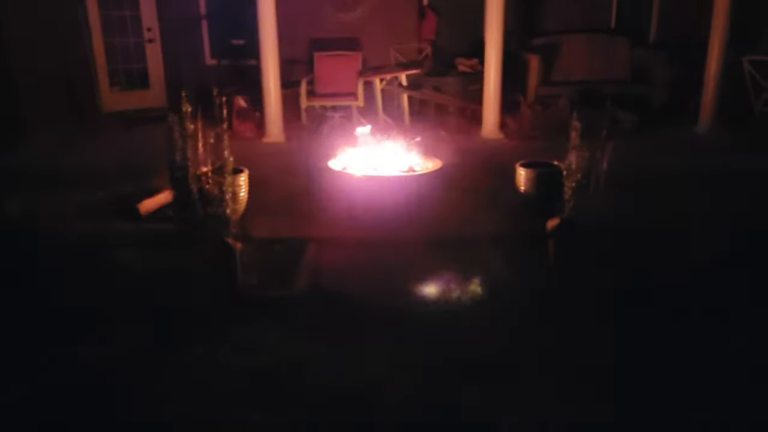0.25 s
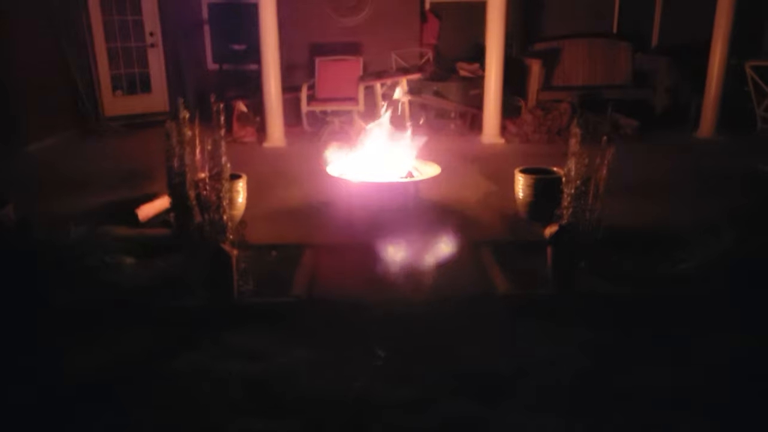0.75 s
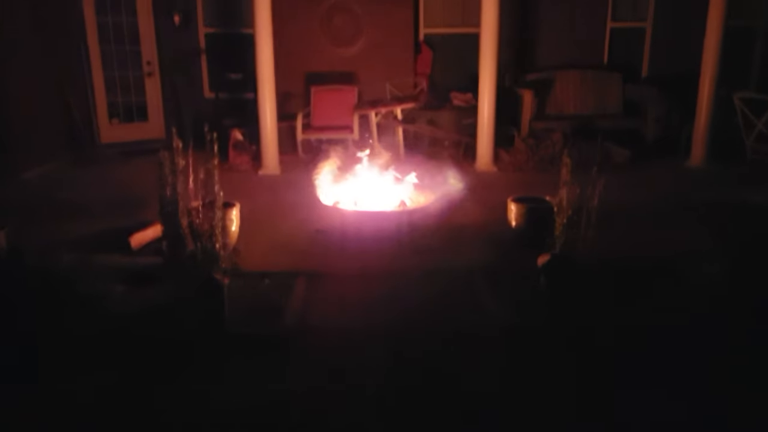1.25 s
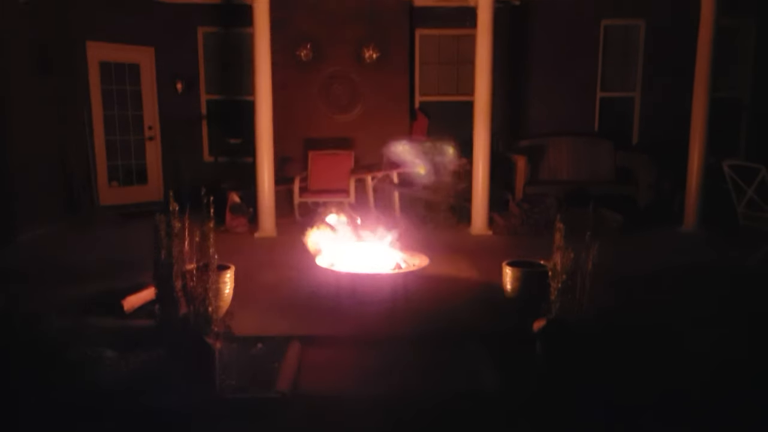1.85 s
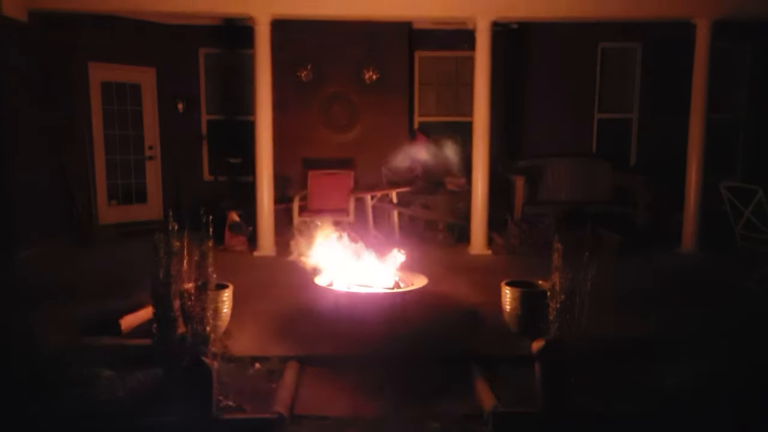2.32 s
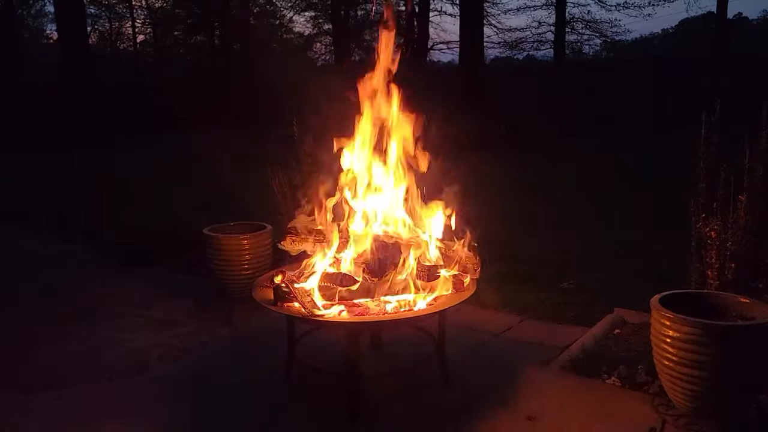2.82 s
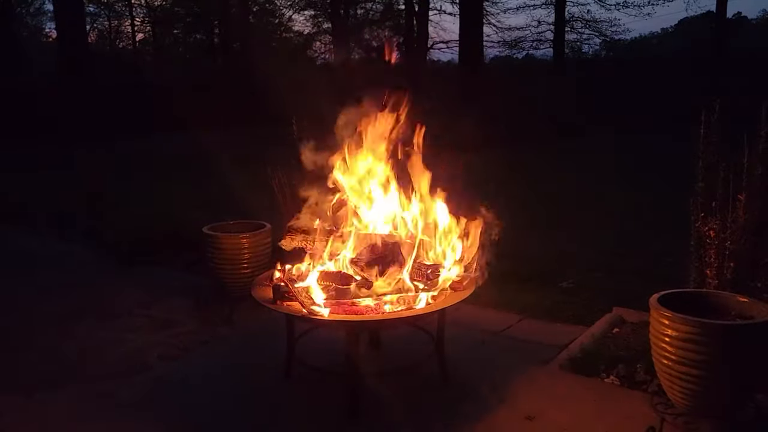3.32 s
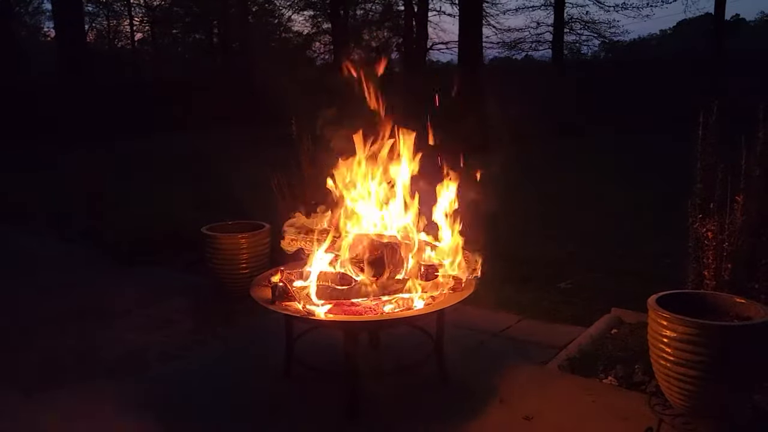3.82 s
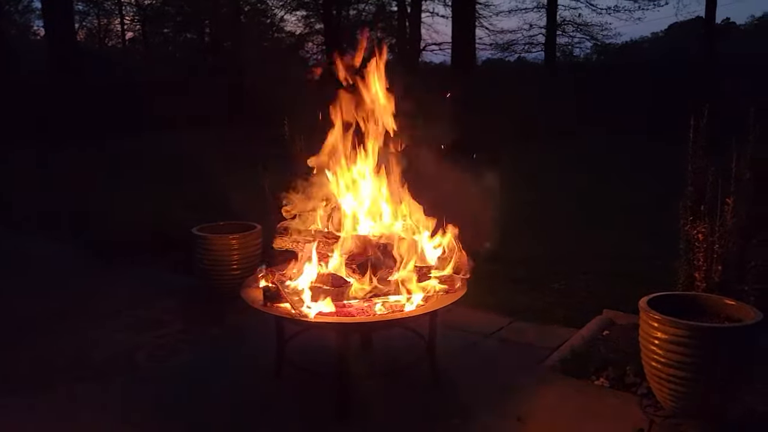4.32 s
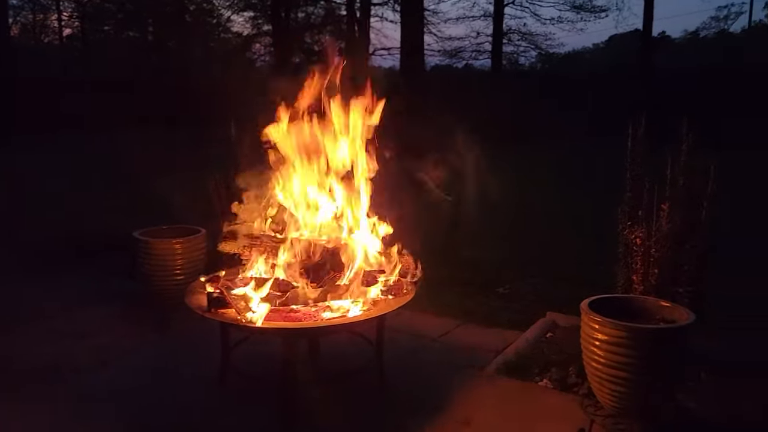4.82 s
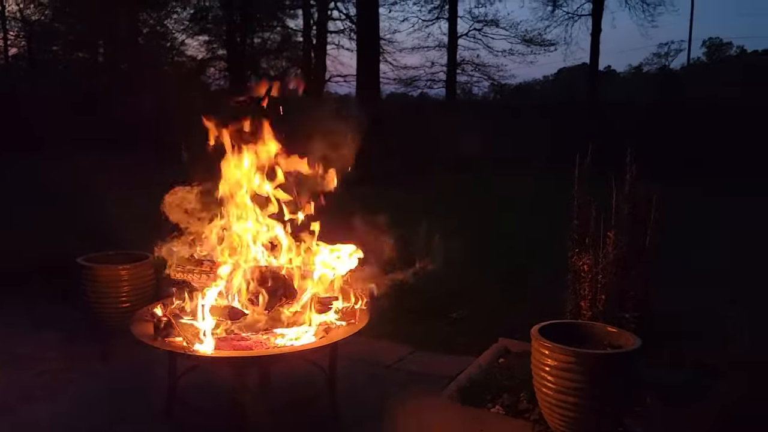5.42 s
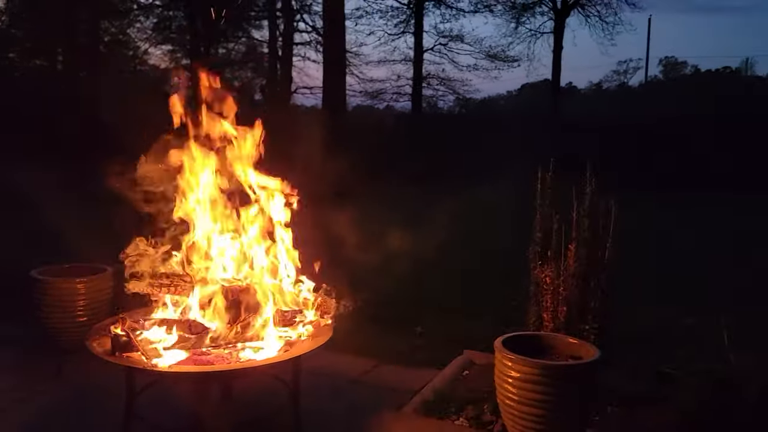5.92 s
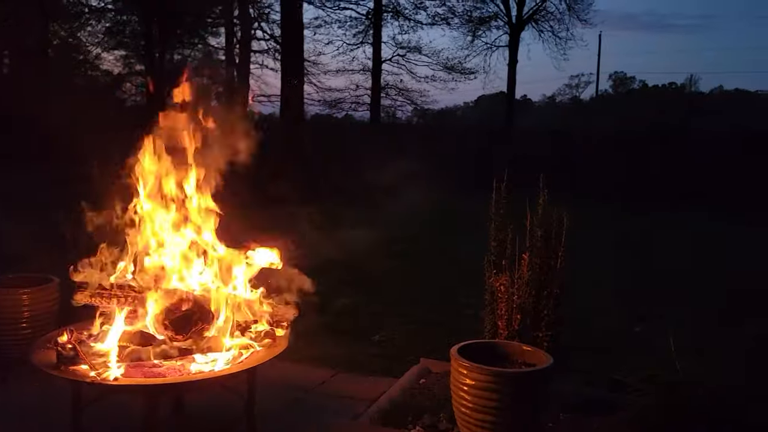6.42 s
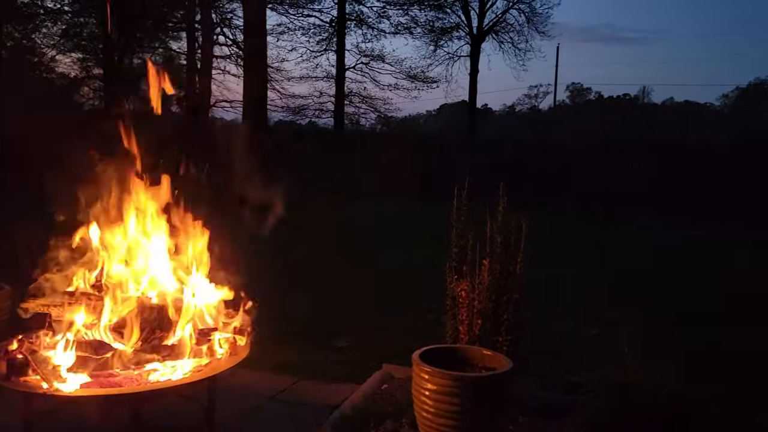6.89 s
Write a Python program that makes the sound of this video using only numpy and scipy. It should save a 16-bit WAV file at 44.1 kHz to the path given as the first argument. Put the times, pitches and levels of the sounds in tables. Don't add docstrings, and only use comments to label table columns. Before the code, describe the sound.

An outdoor fire rumbles in wind while crickets trill, cuts out briefly, then returns calmer and closer, snapping and popping loudly.

```python
import sys
import numpy as np
from scipy import signal
from scipy.fft import rfft, irfft, next_fast_len
from scipy.io import wavfile
from scipy.ndimage import uniform_filter1d

SR = 44100
rng = np.random.default_rng(int(sys.argv[2]) if len(sys.argv) > 2 else 0)


def ratio(d):
    e = np.asarray(d, float) / 20
    return 10 ** e


def dump(signal):
    limited = np.clip(np.atleast_2d(signal).T, -1, 1)
    pcm = np.round(limited * 32767).astype(np.int16)
    wavfile.write(sys.argv[1], SR, pcm)


N = 315315
T = np.arange(N) / SR

FAR_S, NEAR_S = 2.4306, 2.650
# centre_hz, width_hz, level_db
SNAP = [(4700, 1200, 0), (6600, 1200, -10), (9600, 900, -23)]
# centre_hz, width_hz, level_db
TICK = [(9800, 440, -1.5), (12540, 1700, -3.5), (14400, 5300, -2.5)]


def unit(x):
    return x / np.sqrt(np.mean(x ** 2))


def at_hz(table, hz):
    table_hz, value = np.transpose(table)
    return np.interp(np.log(hz), np.log(table_hz), value)


def walk(rate):
    hold = int(SR / rate)
    steps = np.repeat(rng.standard_normal(N // hold + 1), hold)
    return unit(uniform_filter1d(uniform_filter1d(steps, hold), hold)[:N])


def sides(pan_db):
    return ratio(np.array([pan_db / 2, -pan_db / 2])).reshape(2, -1)


def ring(x, modes):
    size = 1024
    hz = np.fft.rfftfreq(size, 1 / SR) + 1
    power = 0
    for mid_hz, width_hz, db in modes:
        power = power + ratio(2 * db) / (1 + ((hz - mid_hz ** 2 / hz) / width_hz) ** 2) ** 2
    cepstrum = irfft(np.log(power + 1e-12) / 2)
    cepstrum[1:size // 2] *= 2
    cepstrum[size // 2 + 1:] = 0
    body = irfft(np.exp(rfft(cepstrum)))[:size // 2]
    return signal.fftconvolve(x, body[None] / np.abs(body).max(), axes=1)[:, :x.shape[1]]


def flames_and_air(heard, colour, alike, lag_s, flames, follow, gust_db, pan_db, flicker_db, roar_flicker_db):
    # pitch_hz, left_minus_right_db
    port_table = [(60, -1), (110, 1.5), (200, -1), (380, 1), (700, 0.5), (1290, -3.5), (2380, 5),
                  (4400, -3.5), (8120, 14.5), (15000, -16.5)]
    # pitch_hz, level_db (per Hz)
    self_noise = [(4880, -55.5), (8300, -25.5), (10400, 1), (11400, -5), (12500, -1.5), (15100, -4.5),
                  (15700, -5.5)]
    roar_shape, hiss_shape, hiss_db, self_db, level_db = colour
    height = np.interp(T, *np.transpose(flames))[heard]
    gust_db, pan_db = gust_db[heard], pan_db[heard]
    roar_db, mid_db, top_db = (share * (height - np.median(height)) for share in follow)
    roar_db = roar_db + gust_db - np.median(gust_db)

    size = next_fast_len(len(pan_db))
    hz = np.fft.rfftfreq(size, 1 / SR) + 1e-3
    common = np.clip(at_hz(alike, hz), 0, .97)
    late = np.exp(-2j * np.pi * hz * lag_s)
    left, other = rfft(rng.standard_normal((2, N))[:, :size])
    right = common * late * left + np.sqrt(1 - common ** 2) * other

    shape = np.hypot(ratio(at_hz(roar_shape, hz)), ratio(at_hz(hiss_shape, hz) + hiss_db))
    shape = np.hypot(shape, ratio(at_hz(self_noise, hz) + self_db))
    shape /= np.sqrt(1 + common * late.real)
    both = np.array([left, right]) * shape * sides(at_hz(port_table, hz))
    both *= ratio(level_db) / np.sqrt(np.mean(irfft((both[0] + both[1]) / 2, size) ** 2))

    out = np.zeros((2, N))
    for centre_hz in 32 * 2. ** np.arange(10):
        octave = np.clip(1 - abs(np.log2(hz / centre_hz)), 0, 1)
        band = irfft(both * octave, size)[:, :len(pan_db)]
        low = np.interp(centre_hz, [150, 500], [1, 0])
        high = np.interp(centre_hz, [3000, 8000], [0, 1])
        db = low * roar_db + high * top_db + (1 - low - high) * mid_db
        db = db + (low * roar_flicker_db + (1 - low) * flicker_db) * walk(9)[heard]
        out[:, heard] += band * ratio(db) * (sides(low * pan_db) if low else 1)
    return out


def cracks(shared=0.41, ragged=0.17, pan_db=2.5, bounce=.7, lumpy_db=2.8, dull_db=-3):
    # start_s, snap_db, knock_above_snap_db, knock_hz, echo_db
    large_pockets = [(0.3614, -64.5, 12, 730, -14), (1.939, -59, -3, 800, -31), (2.336, -58, -10, 680, -37),
                     (3.075, -45.5, 9, 1157, -16), (3.754, -60, 5, 960, -16), (4.083, -55.5, -12, 770, -28),
                     (4.2911, -57, -4, 993, -24), (4.3065, -51.5, 7.5, 2130, -37),
                     (4.4848, -35, 1, 2150, -27.5), (4.5113, -46, -7, 2250, -40),
                     (4.999, -55, 8, 1470, -17), (5.517, -53.5, 3, 1230, -21),
                     (6.3711, -53, 4.5, 2120, -20), (6.7245, -32, 3, 1470, -21.5),
                     (6.7874, -55, 0, 762, -19), (6.9053, -52, 0, 1310, -22)]
    # start_s, snap_db, tick_above_snap_db
    small_pockets = [(1.6394, -67, -9), (2.1136, -64, -19), (3.342, -65, -15), (3.6204, -66, -4),
                     (3.693, -65, -16), (4.126, -66, -6), (4.1784, -61, -3), (4.44, -64, -35),
                     (4.517, -61, -11), (4.5747, -62, -13), (5.048, -59.5, -11), (5.154, -63, -2.5),
                     (5.6706, -55.5, -10), (5.7618, -55, -6), (5.9342, -58, -22), (6.0614, -59, -17),
                     (6.7937, -62, -18), (6.8143, -59, -29), (6.871, -59, -27), (6.9804, -71, -22),
                     (7.099, -63, -19)]
    # centre_hz, width_hz, level_db
    knock_modes = [(450, 450, -5), (900, 800, -3), (2250, 1000, -4), (3200, 1200, -7)]
    large_tick_db = -71.5
    spit_knock_db, spit_knock_hz, spit_echo_db = -7.5, 985, -23
    split_s = .0016
    echo_start_s, echo_end_s, echo_fade_s = 0.0078, 0.039, 0.069

    size = int(.2 * SR)
    lag = np.arange(size) / SR
    tail = np.exp(-np.clip(lag - echo_end_s, 0, 1) / echo_fade_s * 3.4 - lag / 0.081)
    cloud = np.clip(lag / echo_start_s, 0, 1) * tail
    cloud = cloud * ratio(lumpy_db * np.array([walk(270), walk(300)])[:, :size])

    pockets = [(s, db, knock_db, hz, large_tick_db - db, echo_db)
               for s, db, knock_db, hz, echo_db in large_pockets]
    pockets += [(s, db, spit_knock_db, spit_knock_hz, tick_db, spit_echo_db)
                for s, db, tick_db in small_pockets]
    out = np.zeros((2, N + size))
    for s, db, knock_db, knock_hz, tick_db, echo_db in pockets:
        noise = rng.standard_normal((5, size))
        splinters = shared * noise[0] + (1 - shared) * 1.56 * noise[1:3]
        burst = splinters * np.exp(-lag / split_s) * ragged
        burst[[0, 1], [0, 7]] += 1
        late = int(SR / knock_hz)
        burst[[0, 1], [late, late + 6]] += bounce
        burst = burst * sides(pan_db)
        echo = ratio(echo_db - 11) * cloud * noise[3:]
        knock = ring(burst + echo, knock_modes + [(knock_hz, 0.5 * knock_hz, -1.5)])
        bright = burst + ratio(dull_db) * echo
        crack = ratio(knock_db) * knock - ring(bright, SNAP) + ratio(tick_db + 7.0) * ring(bright, TICK)
        i = int((s + .0004) * SR)
        out[:, i:i + size] += ratio(db + 3.5) * crack
    return out[:, :N]


def crackle(per_s=60, spread_db=3.5, level_db=-78):
    clicks = (rng.random(N) < per_s / SR) * ratio(level_db + spread_db * rng.exponential(size=N))
    clicks = clicks * sides(3.0 * rng.standard_normal(N))
    return ring(clicks, SNAP) + ratio(-1.5) * ring(clicks, TICK)


def cricket(trill, wing, stroke=.78, uneven_db=1.7, smear_s=.011):
    bout_edge_s = 0.022
    rate, wing_hz, fall_hz, pan_db, wet_db, swell_db = wing
    cycles = np.cumsum(rate * (1 + .011 * walk(12))) / SR
    part = np.clip(cycles % 1 / stroke, 0, 1)
    size, start, detune = rng.standard_normal((3, N // 500))[:, cycles.astype(int)]
    pitch_hz = wing_hz * (1 + 0.003 * detune) - fall_hz * part ** 2.6
    phase = 2 * np.pi * (np.cumsum(pitch_hz) / SR + start)
    tone = ratio(uneven_db * size) * np.sin(np.pi * part ** 0.85) * np.sin(phase)

    direct = np.array([tone, np.roll(tone, shift=19)])
    lag = np.arange(3000) / SR
    paths = rng.standard_normal((2, len(lag))) * np.exp(-lag / smear_s)
    scatter = signal.fftconvolve(tone[None], paths, axes=1)[:, :N]
    singing = np.zeros(N)
    for on, off, db in trill:
        singing += ratio(db) * np.clip(np.minimum(T - on, off - T) / bout_edge_s + .5, 0, 1)
    song = unit(unit(direct) + ratio(wet_db) * unit(scatter))
    return song * ratio(swell_db * walk(10)) * singing * sides(pan_db)


def gusts():
    # middle_s, half_length_s, above_calm_db, left_minus_right_db
    gust_table = [(0.047, 0.047, 10, -6), (0.215, .05, 9.5, -13.5), (0.525, 0.29, 4, 2),
                  (0.803, 0.17, 6.5, 5), (1.063, 0.031, 2.5, 8), (1.303, 0.055, 5.5, 4),
                  (1.44, 0.081, 5, 0), (1.717, 0.029, 4.5, -4.5), (1.83, 0.025, 5, -3),
                  (2.028, 0.076, 6, 0.5), (2.331, 0.1, 10, -17), (2.426, .04, 8.5, 1.5)]
    s, half_s, db, pan_db = np.transpose(gust_table)[:, :, None]
    bell = np.exp(-((T - s) / half_s) ** 2)
    return np.max(db * bell, axis=0), np.sum(pan_db * bell, axis=0)


def far_place():
    colour = [(15, -39), (25, -28), (52, 3), (78, 2), (98, -5.5), (162, -18.5), (350, -29), (460, -63.5),
              (770, -120)], [(240, -22), (400, -1.5), (656, -1.5), (724, -0.5), (1330, -5), (1680, -4.5),
              (2130, -8), (2530, -8), (2970, -20), (3490, -21.5), (4250, -4.5), (5180, -21.5), (6890, -27),
              (7700, -49), (10000, -48.5), (16900, -120)], -28, -67, -43
    # pitch_hz, share (0-1)
    alike = [(60, 0.3), (150, 0.55), (300, 0.22), (700, 1), (1500, 0.49), (3000, 0.49), (6000, 0.47),
             (15000, 0.12)]
    # time_s, height_db
    flames = [
        (0, 3.1),
        (0.12, 1.9),
        (0.31, 6.5),
        (0.601, 4.8),
        (0.86, 1.5),
        (1.391, 0.068),
        (2.43, 0.14),
    ]
    follow = (0.1, 0.29, 1.25)
    # start_s, end_s, level_db
    close_trill = [
        (0, 1.11, -54.5),
        (1.73, 1.8, -52.5),
        (2.075, 2.44, -55.5),
    ]
    faint_trill = [
        (0.2, 1.45, -82),
        (1.45, 3, -78.5),
    ]
    # pulses_per_s, wing_hz, fall_hz, left_minus_right_db, scattered_above_direct_db, swell_db
    close_wing = (45, 4285, 640, -0.5, -1.5, 1.3)
    faint_wing = (58.5, 4481, 296.5, -11, 4.7, -1)
    heard = slice(0, int(FAR_S * SR))
    fire = flames_and_air(heard, colour, alike, 0.000469, flames, follow, *gusts(),
                          flicker_db=1.7, roar_flicker_db=1.3)
    return fire + cricket(close_trill, close_wing) + cricket(faint_trill, faint_wing)


def near_place():
    colour = [(15, -18), (25, -21.5), (59, 2.5), (86, 0.5), (162, -12), (211, -14.5), (400, -27),
              (520, -57), (880, -120)], [(260, -50), (450, -5.5), (519, -6), (698, -0.5), (777, -1.5),
              (929, -0.5), (1440, -1.5), (1830, -4.5), (3350, -20), (3960, -8.5), (4200, -8.5),
              (5020, -16.5), (6290, -21.5), (7700, -40), (10000, -104), (16900, -120)], -25, -60, -48
    # pitch_hz, share (0-1)
    alike = [(60, 1), (150, 1), (300, 0.79), (700, 0.59), (1500, 0.44), (3000, 0.45), (6000, 0.1),
             (15000, 0.11)]
    # time_s, height_db
    flames = [(2.67, -55), (2.71, -50), (4.11, -53), (4.15, -55), (4.22, -54), (5.7, -52), (5.8, -56.5),
              (6.1, -50.5), (7.15, -52.5)]
    follow = (0.83, 0.051, 0.12)
    # start_s, end_s, level_db
    slow_trill = [(2.65, 2.73, -73), (2.73, 2.83, -62), (2.83, 3.16, -68.5), (3.16, 3.24, -68),
                  (3.24, 3.65, -69.5), (3.65, 4.15, -69.5), (4.15, 4.41, -72.5)]
    right_trill = [
        (2.65, 3.45, -74),
        (5.08, 5.3, -78),
        (5.3, 7.16, -72),
    ]
    late_trill = [
        (5.5, 6.32, -76.5),
        (6.32, 7.16, -66),
    ]
    # pulses_per_s, wing_hz, fall_hz, left_minus_right_db, scattered_above_direct_db, swell_db
    slow_wing = (32, 4130, 250, 0.9, 3, 1.2)
    right_wing = (41, 4410, 262.5, -7, 1, 1.5)
    late_wing = (47, 4100, 670, 0.5, 1.5, 1.9)
    heard = slice(int(NEAR_S * SR), N)
    licks_db = -1.5 * walk(3.3)
    fire = flames_and_air(heard, colour, alike, 0.000411, flames, follow, licks_db, np.full(N, -1.1),
                          flicker_db=1.0, roar_flicker_db=1.1)
    crickets = cricket(slow_trill, slow_wing) + cricket(right_trill, right_wing)
    return fire + crickets + cricket(late_trill, late_wing)


def scene():
    # pitch_hz, level_db
    housing = [(20, 0.5), (7000, 3), (7600, 2), (8150, -12), (9000, 7), (9600, 3.5), (22050, 1.5)]
    hz = np.fft.rfftfreq(N, 1 / SR) + 1e-3
    wood = cracks() + crackle() * (T > NEAR_S)
    wood = irfft(rfft(wood) * ratio(at_hz(housing, hz)), N)
    fade_in_s = .016
    fade_in = np.sin(np.pi / 2 * np.clip((T - NEAR_S) / fade_in_s, 0, 1)) ** 2
    cut = np.clip(np.minimum(T / .003, (FAR_S - T) / .00007), 0, 1)
    return (far_place() + wood) * cut + (near_place() + wood) * fade_in


def band_limit(x):
    return signal.sosfilt(signal.butter(12, 16430, fs=SR, output="sos"), x)


def record(dry):
    low_pass = signal.ellip(8, .2, 70, 15800, fs=SR, output="sos")
    mix = signal.sosfilt(low_pass, dry)
    return band_limit(mix)


dry = scene()
out = record(dry)
dump(out)
```